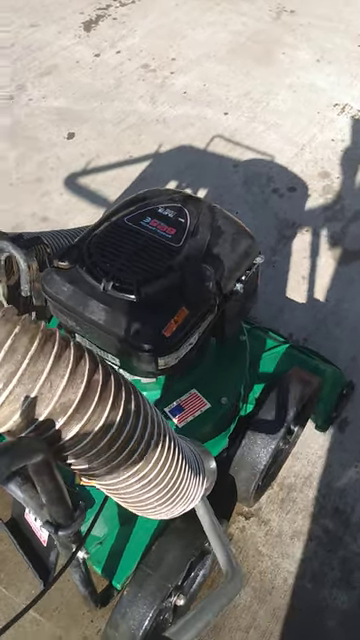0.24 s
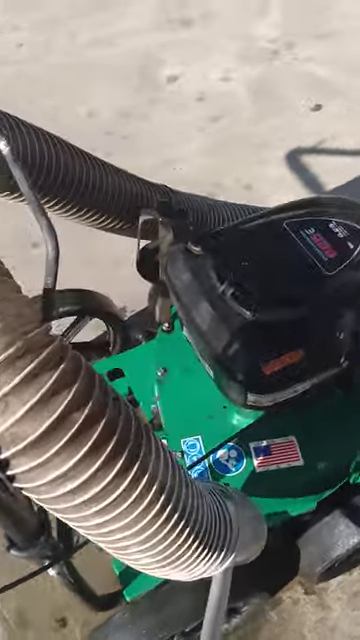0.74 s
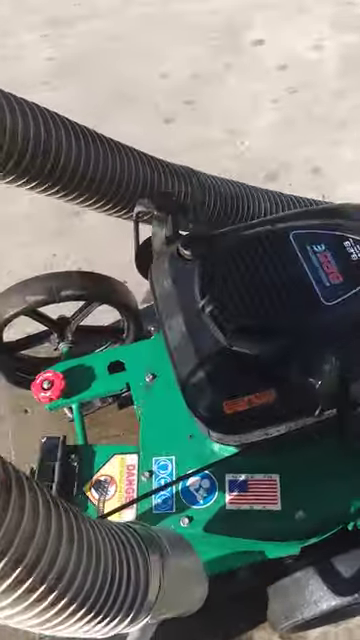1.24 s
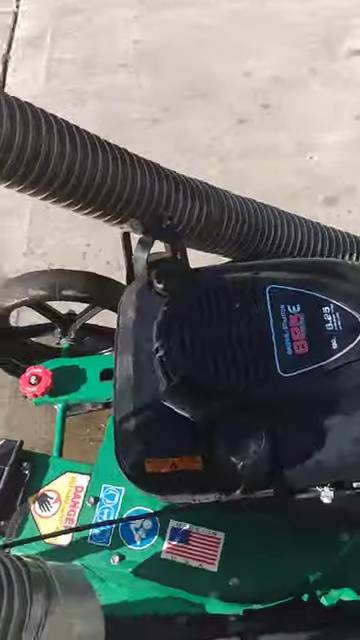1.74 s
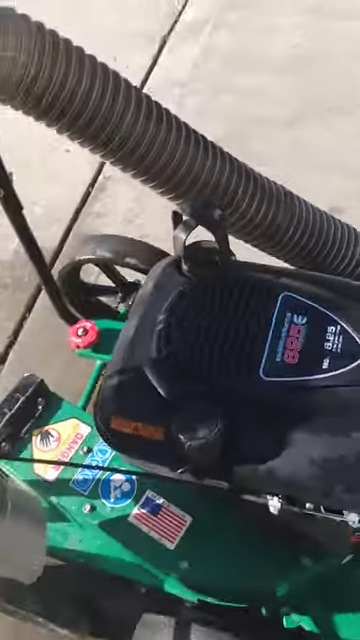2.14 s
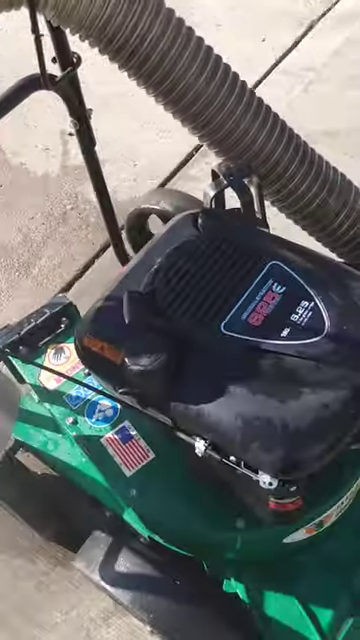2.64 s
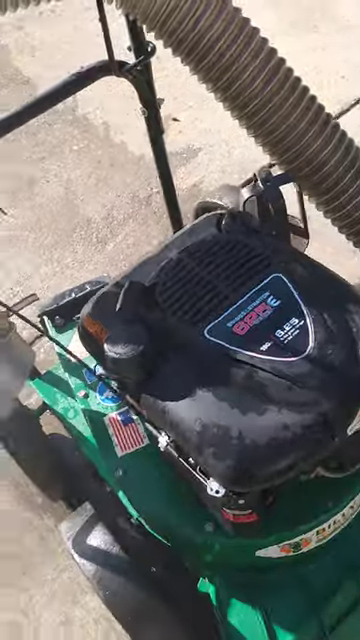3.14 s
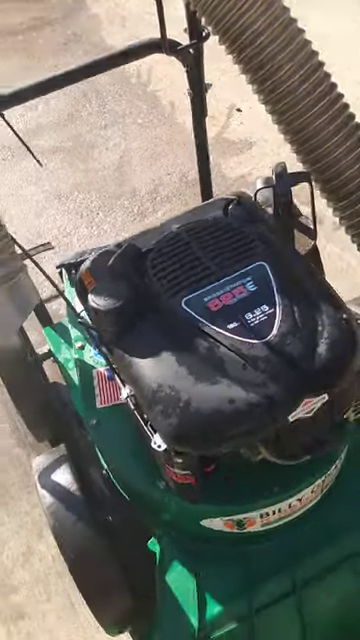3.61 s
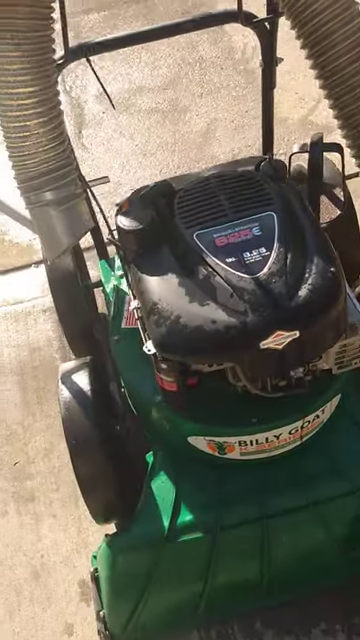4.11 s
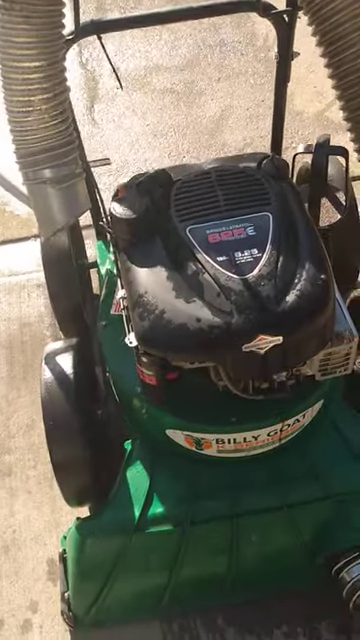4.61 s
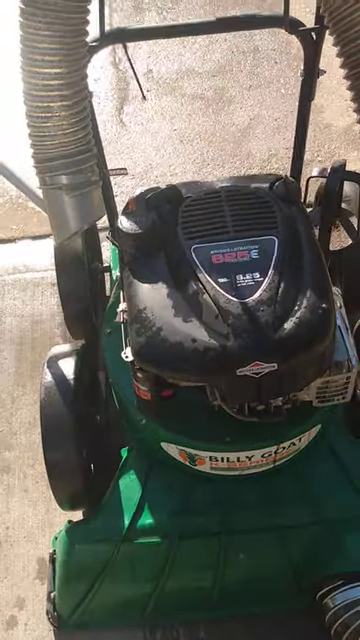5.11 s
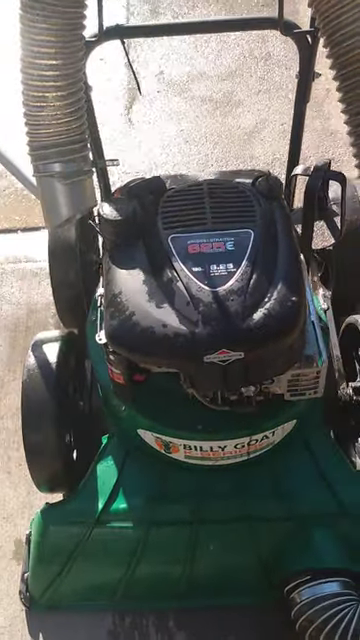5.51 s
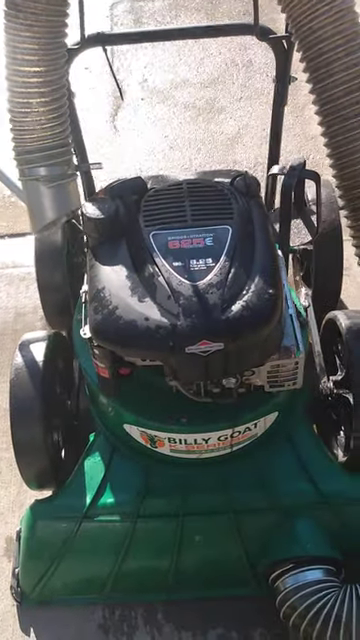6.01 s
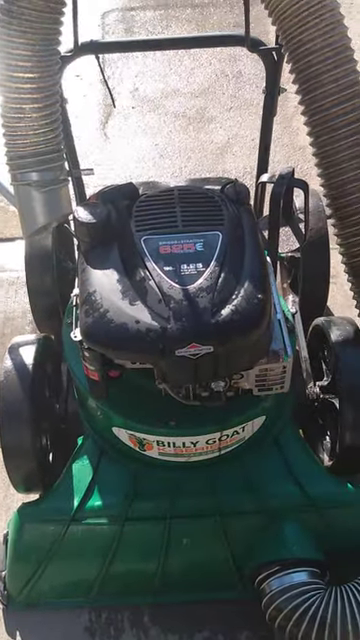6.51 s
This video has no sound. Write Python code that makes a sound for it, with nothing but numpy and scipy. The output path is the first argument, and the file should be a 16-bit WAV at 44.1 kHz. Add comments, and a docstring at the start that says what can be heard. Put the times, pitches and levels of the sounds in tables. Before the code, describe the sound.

Close stereo pickup just above a small petrol machine coasting down in an open yard. A strong low blade hum and breathy whirr sink and weaken, with quick valve ticks and soft low puffs underneath. A sharp steel clack with a brief ring interrupts, then separate compression strokes chug along as wheeze, click, dull thud and falling honk, slowing but not quite stopping by the end.

```python
"""A petrol leaf vacuum on concrete has just been switched off and coasts down, heard from close above.
First a five-blade impeller hums lower and lower (sines locked to the shaft) over a rush of air (shaped noise);
the four-stroke engine ticks (gated noise) and puffs (low pulses) in every cycle.
At low speed the compression release drops in with a clack (noise bursts and ringing casing modes);
from then on the strokes wheeze and click (noise), thud (pulses) and honk (rough falling tones)."""
import sys
import numpy as np
from scipy.fft import rfft, irfft, next_fast_len
from scipy.io import wavfile
from scipy.ndimage import uniform_filter1d, map_coordinates

SR = 44100
rng = np.random.default_rng(int(sys.argv[2]) if len(sys.argv) > 2 else 0)


def generate_wav(sig):
    """Save sig (samples, or channels by samples) to the path in sys.argv[1] as 16-bit PCM at SR."""
    pcm = np.round(np.clip(np.atleast_2d(sig).T, -1, 1) * 32767).astype(np.int16)
    wavfile.write(sys.argv[1], SR, pcm)


N = 297656

# compression strokes with the release open: t/s, click level/dB
STROKES = [(3.7749, -30), (3.909, -32.5), (4.0461, -27.5), (4.1874, -29), (4.335, -30.5), (4.4884, -29),
           (4.6472, -33), (4.8132, -28), (4.9868, -28), (5.1705, -33.5), (5.3639, -32.5), (5.5652, -39.5),
           (5.7872, -32.5), (6.0229, -40), (6.2774, -42.5), (6.557, -45)]
# release weight strikes, then rebounds: t/s, level/dB
CLACKS = [(3.6373, -13.5), (3.646, -38.5), (3.658, -31)]
# engine's own sounds: t/s, valve gear level/dB, port puff level/dB
ENGINE_LEVELS = [(0, -46, -37), (1.7, -44, -19), (2.6, -42.5, -19), (3.5, -43.5, -21.5),
                 (4.1, -46.5, -20.5), (5.3, -54, -27), (6.75, -62.5, -29)]
# bright rubbing noise, relative spectrum: f/Hz, level/dB
RUB_SPECTRUM = [(3000, -27), (5500, -7.5), (8000, 1), (9600, 1.5), (10200, -2.5), (10550, 0), (10900, 1.5),
                (11600, 3), (13500, -3), (16000, 3)]

START_CYCLE = -.302
# drag speed: where air drag equals dry friction
FRICTION_TURNS_PER_S2, DRAG_TURNS_PER_S, STANDSTILL_S = 2.471, 21.422, 9.170
REFERENCE_TURNS_PER_S = 20


def amp(db):
    """Decibels to gain."""
    return 10 ** (np.asarray(db) / 20)


def unit(x):
    """Scaled to rms 1."""
    return x / np.sqrt(np.mean(x ** 2) + 1e-20)


def along(points, hz):
    """(Hz, value) points interpolated on a log frequency axis."""
    f, v = np.transpose(points)
    return np.interp(np.log(hz + 1), np.log(f + 1), v)


def clock():
    """The time of each sample, s."""
    return np.arange(N) / SR


def curves(rows):
    """One value per sample for each column after the time."""
    s, *cols = np.transpose(rows)
    return [np.interp(clock(), s, c) for c in cols]


def wobble(rate_hz):
    """A smooth random curve, rate_hz knots a second."""
    s = np.arange(0, N + 8, 8) / SR  # every 8th sample
    knots = rng.standard_normal(int(N * rate_hz / SR) + 4)
    return np.interp(clock(), s, map_coordinates(knots, [s * rate_hz]))


def filtered(x, response):
    """x times a response of frequency."""
    m = next_fast_len(N + 8192)
    return irfft(rfft(x, m) * response(np.fft.rfftfreq(m, 1 / SR)), m)[..., :N]


def rush(spectrum, grain_db=0):
    """Stereo noise of rms 1, most alike left and right near 350 Hz; grain makes it rattle."""
    # left-right correlation: f/Hz, correlation/1
    likeness = [(40, .1), (80, 0.81), (150, 0.84), (350, 0.94), (700, 0.67), (1400, 0.19), (2800, 0.14),
                (5000, 0), (15000, 0)]

    def mid_side(hz):
        angle = np.arccos(np.clip(along(likeness, hz), -1, 1)) / 2
        return amp(along(spectrum, hz)) * np.array([np.cos(angle), np.sin(angle)])

    white = rng.standard_normal((2, N)) * amp(grain_db * wobble(900))
    mid, side = filtered(white, mid_side)
    return unit(np.array([mid + side, mid - side]))


def swell(t, rise, fall):
    """An envelope that grows to 1 at t = 0 and dies away, both exponentially (s)."""
    return np.exp(np.minimum(t / rise, -t / fall))


def around():
    """Time axis of a short event, centred on it, s."""
    return np.arange(-SR // 5, SR // 5) / SR


def add(track, s, sound):
    """Mix a short sound into the track, centred at s seconds."""
    at = round(s * SR) - len(sound) // 2 + np.arange(len(sound))
    inside = (at >= 0) & (at < N)
    track[at[inside]] += sound[inside]


def shaft_speed(s):
    """Turns/s of a flywheel braked by dry friction and by air drag that grows with speed squared."""
    return DRAG_TURNS_PER_S * np.tan(FRICTION_TURNS_PER_S2 / DRAG_TURNS_PER_S * (STANDSTILL_S - s))


def by_speed(s, db, per_decade_db):
    """A level that is db at the reference speed and follows the logarithm of speed."""
    return db + per_decade_db * np.log10(shaft_speed(s) / REFERENCE_TURNS_PER_S)


def release_open():
    """True from the moment the compression release drops in."""
    return clock() > CLACKS[0][0]


def labour():
    """How much the strokes show: small at speed, 1 from 17 turns/s down."""
    return np.minimum(17 / shaft_speed(clock()), 1) ** 2


def surge(cycle, depth_db=1.0):
    """Low sounds come in three surges a cycle, deeper as the engine slows (dB)."""
    return depth_db * labour() * np.cos(2 * np.pi * 3 * (cycle - .86))


def yard(level_db=-45.0):
    """Steady outdoor background: noise strongest in the bass, with a narrow band near 1050 Hz."""
    # relative spectrum: f/Hz, level/dB
    yard_spectrum = [(25, -20), (55, 5.5), (110, 8), (250, -33), (800, -22), (980, -31), (1050, -4.5),
                     (1130, -27), (2000, -20), (5000, -27.5), (15000, -43.5)]
    return amp(level_db) * rush(yard_spectrum)


def frame(cycle, apart_rad=1.0):
    """The frame rocks on its wheels at low multiples of the cycle rate, in differing phase left and right."""
    # frame response, relative: f/Hz, level/dB
    shake_response = [(20, -47), (35, -23.5), (52, -3), (70, 1.5), (100, -11), (160, -19), (300, -23.5)]
    # frame shake, renewed when the release drops in: t/s, level/dB
    rocking = [(0, -35), (2, -35), (2.6, -37.5), (3.2, -43), (3.65, -36), (4.6, -39), (5.3, -39.5),
               (6.1, -46.5), (6.75, -41)]
    cycle_hz = shaft_speed(clock()) / 2
    orders = np.zeros((2, N))
    for k in range(2, 26):
        phase = 2 * np.pi * k * cycle + rng.uniform(0, 2 * np.pi) + apart_rad * rng.standard_normal((2, 1))
        orders += amp(along(shake_response, k * cycle_hz) + 1.2 * wobble(7.1)) * np.sin(phase)
    return amp(curves(rocking)[0] + surge(cycle)) * unit(orders * np.sqrt(cycle_hz))


def air(cycle, flutter_db=1, load_db=1.0):
    """Turbulence in the housing, the duct and between the blades, weaker as the shaft slows."""
    # relative spectra: f/Hz, level/dB
    rumble_spectrum = [(30, -37), (60, -3), (90, -2), (120, 5), (170, 5.5), (230, 1), (310, 2), (385, -3.5),
                       (470, -3.5), (620, -12), (1200, -44)]
    duct_spectrum = [(250, -26), (450, -11.5), (580, -4), (715, 0), (770, 4.5), (830, 1.5), (990, -2),
                     (1050, -0.5), (1110, -5.5), (1400, -8.5), (2000, -41.5)]
    whirr_spectrum = [(700, -50), (1250, -4), (1600, 5.5), (1850, 3.5), (2010, 8.5), (2180, 2.5),
                      (2380, 3.5), (2750, 1.5), (3200, -10), (4200, -9), (4900, -14.5), (5600, -19.5),
                      (9000, -31), (16000, -27)]
    # microphone leans in over the engine and draws back: t/s, level/dB
    nearness = [(0, -3), (1.25, -2), (1.75, 3.5), (2.4, 3), (3.1, 2), (4.2, 0.5), (6.75, 1)]
    s, near_db = clock(), curves(nearness)[0]
    rumble_db = near_db + by_speed(s, db=-33.5, per_decade_db=37.5) + surge(cycle) / 2
    duct_db = near_db + by_speed(s, db=-39.5, per_decade_db=29)
    whirr_db = near_db + by_speed(s, db=-42, per_decade_db=29)
    # twice a cycle = once a turn
    flutter = flutter_db * np.sin(2 * np.pi * 2 * cycle)
    # with the release open, the whirr swells into each compression stroke
    load = load_db * release_open() * np.cos(2 * np.pi * (cycle - .56))
    rumble = amp(rumble_db + 1.3 * wobble(30)) * rush(rumble_spectrum)
    duct = amp(duct_db + flutter + 1.42 * wobble(30)) * rush(duct_spectrum, grain_db=3.0)
    whirr = amp(whirr_db + flutter + load + 1.35 * wobble(30)) * rush(whirr_spectrum, grain_db=1)
    return rumble + duct + whirr


def valve_gear(cycle, tick_floor_db=-16, rub_floor_db=-23, vary_db=1.5,
               sing_db=-11, sing_share=0.34, sing_width=0.1):
    """Cam and valves tick, then rub with a bright hiss, at fixed places in the cycle."""
    # cam and valve contacts: place/cycle, width/cycle, tick level/dB, rub level/dB, change once open/dB
    contacts = [(0.016, 0.059, 2.5, 4, -4), (.25, 0.12, -9, -5.5, 2.5), (.395, .025, -8, -13.5, 9),
                (.62, 0.061, -12, -35, -1), (.83, 0.022, -13, -25, 15)]
    # relative spectra, tick and faint two-band singing of the rub: f/Hz, level/dB
    tick_spectrum = [(1500, -39), (3000, 11.5), (4500, 11.5), (6000, 5.5), (8000, -4), (10500, -4.5),
                     (13000, -8.5), (16000, -18.5)]
    sing_spectrum = [(9700, -44), (10100, -3), (10300, 5), (10550, -20), (10800, -5), (11000, -1),
                     (11500, -38.5)]

    def touch(share, width):
        from_contact = (cycle - share + .5) % 1 - .5
        return np.exp(-(from_contact / width) ** 2)

    tick, rub = amp(tick_floor_db), amp(rub_floor_db)
    for share, width, tick_db, rub_db, open_db in contacts:
        contact = touch(share, width) * amp(open_db * release_open())
        tick = tick + amp(tick_db) * contact
        rub = rub + amp(rub_db) * contact
    tick = tick * amp(vary_db * wobble(43)) * rush(tick_spectrum)
    rub = rub * amp(1.9 * wobble(88)) * rush(RUB_SPECTRUM, grain_db=2.0)
    sing = touch(sing_share, sing_width) * amp(sing_db + 3 * wobble(11)) * rush(sing_spectrum)
    return amp(curves(ENGINE_LEVELS)[0]) * (tick + rub + sing)


def ports(cycle, puff_cycles=0.55, thud_cycles=0.66, thud_hz=178, thud_lag_s=0.00444, push_rad=0.46):
    """Gas pushed through a port is a low pulse of a cycle or two; each open compression stroke ends in a thud."""
    # gas puffs of each cycle: place/cycle, f/Hz, level/dB, change once open/dB
    puffs = [(0.116, 117, -3, -8.5), (.41, 143, -5, -6.5), (.72, 145, -11, 5), (.87, 95, -1.5, 1.5),
             (0.021, 130, -14, 8.5)]
    # engine lurches as the release drops in: t/s, peak level/dB, f/Hz
    lurches = [(3.587, -21, 120), (3.633, -15, 192), (3.697, -20, 93)]
    out, t = np.zeros(N), around()
    level_db, is_open = curves(ENGINE_LEVELS)[1], release_open()

    def pulse(hz, width, lean_rad=0):
        """Leaning favours overpressure; without it the pulse swings both ways alike."""
        swing = np.sin(lean_rad - 2 * np.pi * hz * t + rng.normal(0, .3))
        return swing * np.exp(-(t * hz / width) ** 2)

    for share, hz, db, open_db in puffs:
        for i in np.flatnonzero(np.diff(np.floor(cycle - share))):
            size = amp(level_db[i] + db + open_db * is_open[i] + rng.normal(0, 0.73))
            add(out, i / SR, size * pulse(hz * np.exp(rng.normal(0, 0.1)), puff_cycles, push_rad))
    for s, _ in STROKES:
        size = amp(by_speed(s, db=-19.5, per_decade_db=14))
        add(out, s + thud_lag_s, size * pulse(thud_hz, thud_cycles))
    for s, db, hz in lurches:
        add(out, s, amp(db) * pulse(hz, thud_cycles))
    return out


def intake(sag_per_s=3, rough=0.076, lag_cycles=.2):
    """The intake valve flutters in a short, slightly falling honk through the tract, plainer as the engine slows."""
    # intake tract: f/Hz, level/dB, delay/s, rise/s, fall/s
    tract = [(845, -1.5, 0.0042, 0.0039, 0.0074), (619, -11, 0.0054, 0.0072, 0.017),
             (405, -5.5, 0.014, 0.012, 0.011)]
    out, t = np.zeros(N), around()

    def flutter(hz):
        """A rough tone whose pitch falls."""
        jitter = rough * unit(uniform_filter1d(rng.standard_normal(len(t)), size=40))
        pitch_hz = hz * np.exp(-sag_per_s * np.maximum(t, 0)) * (1 + jitter)
        return np.sin(2 * np.pi * np.cumsum(pitch_hz) / SR)

    for s, _ in STROKES:
        honk = sum(amp(db) * swell(t - delay, rise, fall) * flutter(hz)
                   for hz, db, delay, rise, fall in tract)
        cycle_s = 2 / shaft_speed(s)
        add(out, s + lag_cycles * cycle_s, amp(by_speed(s, db=-37, per_decade_db=-16)) * honk)
    return out


def compression(scrape_db=2.5, rebound_db=-10, rebound_s=.007, rise_cycles=0.079, fall_cycles=0.092):
    """Air wheezes past the lifted valve, longer as the engine slows; the valve clicks shut and rebounds."""
    # relative spectra: f/Hz, level/dB
    click_spectrum = [(300, -10), (700, 2.5), (1050, 7), (1350, 5.5), (3000, 2), (4500, 4), (6000, -2.5),
                      (8000, -8), (12000, -7.5), (16000, -14)]
    wheeze_spectrum = [(600, 0), (1100, -7), (1310, 5.5), (1550, -6.5), (1900, 3.5), (2500, -1),
                       (3100, -13), (4500, -12), (7000, -22), (16000, -21)]
    click, wheeze, t = np.zeros(N), np.zeros(N), around()
    for s, snap_db in STROKES:
        cycle_s = 2 / shaft_speed(s)
        add(click, s + 0.0024, amp(snap_db) * swell(t, rise=0.0017, fall=0.0046))
        rebound = amp(snap_db + rebound_db) * swell(t, rise=0.00088, fall=0.016)
        add(click, s + rebound_s * rng.uniform(.6, 1.4), rebound)
        breath = swell(t, rise=rise_cycles * cycle_s, fall=fall_cycles * cycle_s)
        add(wheeze, s + 0.00097, amp(by_speed(s, db=-32.5, per_decade_db=18)) * breath)
    clicks = click * rush(click_spectrum, grain_db=2)
    return clicks + wheeze * amp(scrape_db * wobble(150)) * rush(wheeze_spectrum, grain_db=2.0)


def release(ring_db=-9, tail_db=-16, crack_db=-13):
    """The steel release weight snaps against its stop and rings the casing."""
    # casing modes, levels relative: f/Hz, level/dB, t60/s
    casing = [(706, -8, 0.07), (860, -6, .06), (1150, -17, .05), (1800, 3, 0.072), (2110, -4, 0.072),
              (2340, -4, 0.065), (2620, -7, 0.15), (3020, -12, .08), (3950, -17, 0.062), (4340, -13, .07)]
    # relative spectrum: f/Hz, level/dB
    clack_spectrum = [(250, -8), (450, -2), (620, -8.5), (760, 5), (1000, -8), (1300, 2), (1500, -17.5),
                      (2000, 5.5), (3000, -5), (4300, -5.5), (6000, -13.5), (12000, -19), (16000, -15.5)]
    burst, ring, t = np.zeros(N), np.zeros((2, N)), around()
    for s, db in CLACKS:
        snap = swell(t, rise=0.00024, fall=0.0074) + amp(tail_db) * swell(t, rise=.0004, fall=0.046)
        add(burst, s + 0.0013, amp(db) * snap)
        for side in ring:
            modes = sum(amp(level - 60 * abs(t) / t60) * np.sin(2 * np.pi * hz * t + rng.uniform(0, 2 * np.pi))
                        for hz, level, t60 in casing) * (t > 0)
            add(side, s, amp(db + ring_db) * modes / np.abs(modes).max() * 2)
    # bright edge of the first strike
    crack = amp(crack_db) * swell(clock() - CLACKS[0][0] - .0015, rise=.0003, fall=0.002) * rush(RUB_SPECTRUM)
    return burst * rush(clack_spectrum, grain_db=-1.0) + crack + ring


def impeller(cycle, second_db=-3, third_db=-1, sway_db=-33, drag_cycles=0.0025, throb_db=1,
             fades_below_turns_per_s=20.5, fade_db_per_turn_per_s=11):
    """Five blades pass the housing's outlet, ten times in each engine cycle."""
    # hum: t/s, level/dB
    hum = [(0, -12), (.55, -13.5), (.97, -15), (1.25, -13.5), (1.8, -19.5), (2.1, -21.5), (2.5, -27)]
    # housing response to the blade overtones: f/Hz, level/dB
    housing = [(200, -19.5), (330, -27), (410, -30), (470, -26), (500, -18), (525, -40), (600, -31)]
    speed = shaft_speed(clock())
    level_db = curves(hum)[0] - fade_db_per_turn_per_s * np.maximum(fades_below_turns_per_s - speed, 0)
    # each compression brakes the flywheel, the more the slower it turns, up to a limit
    uneven = np.minimum((25 / speed) ** 3, 2)
    braking = drag_cycles * uneven * np.sin(2 * np.pi * cycle)
    turn = 2 * np.pi * (cycle + 0.00063 * wobble(31) - braking)  # phase of the engine cycle, rad
    blade, blade_hz = 10 * turn, 10 * speed / 2
    throb = -throb_db * uneven * (np.cos(turn) + np.cos(2 * turn)) / 2
    # an overtone stands out while it slides through the housing's resonance
    overtones = sum(amp(db + along(housing, k * blade_hz) + 2.0 * wobble(13.7)) * np.sin(k * blade)
                    for k, db in enumerate([second_db, third_db], 2))
    # the uneven shaft adds weak low orders
    sway = sum(amp(sway_db + 2 * wobble(6.9)) * np.sin(k * turn + rng.uniform(0, 2 * np.pi))
               for k in range(7, 10))
    return np.sqrt(2) * amp(level_db + throb) * (np.sin(blade) + overtones + sway)


def reflected(x, wet_db=-6.5):
    """Close hard surfaces comb the treble, a little differently at each microphone port."""
    # nearby deck, hose and concrete: extra path/ms, level before wet_db/dB
    echoes = [(1.7, -11.5), (3.9, -44.5), (6.3, -10), (8.9, -21), (12.7, -8), (17.3, -11.5)]
    paths = [(ms / 1000 * (1 + .03 * rng.standard_normal((2, 1))), amp(db + wet_db)) for ms, db in echoes]

    def scatter(hz):
        return hz / (hz + 500) * sum(g * np.exp(-2j * np.pi * hz * s) for s, g in paths)

    return filtered(x, lambda hz: 1 + scatter(hz)) / np.sqrt(1 + sum(g * g for s, g in paths))


def scene():
    """The machine, a little to the left, over the outdoor background."""
    cycle = START_CYCLE + np.cumsum(shaft_speed(clock())) / SR / 2  # two turns make one engine cycle
    # left and right gains in dB
    bass = (impeller(cycle) + ports(cycle) + frame(cycle)) * amp([[1.1], [-1.1]])
    running = reflected(air(cycle) + valve_gear(cycle) + intake()) * amp([[1.05], [-1.05]])
    knocks = (compression() + release()) * amp([[1.4], [-1.4]])
    return bass + running + knocks + yard()


def record(dry, low_hz=33, top_hz=15900):
    """The microphone thins the deepest bass and keeps nothing above its band limit."""
    return filtered(dry, lambda hz: (hz < top_hz) * hz ** 4 / (hz ** 4 + low_hz ** 4))


dry = scene()
out = record(dry)
generate_wav(out)
```